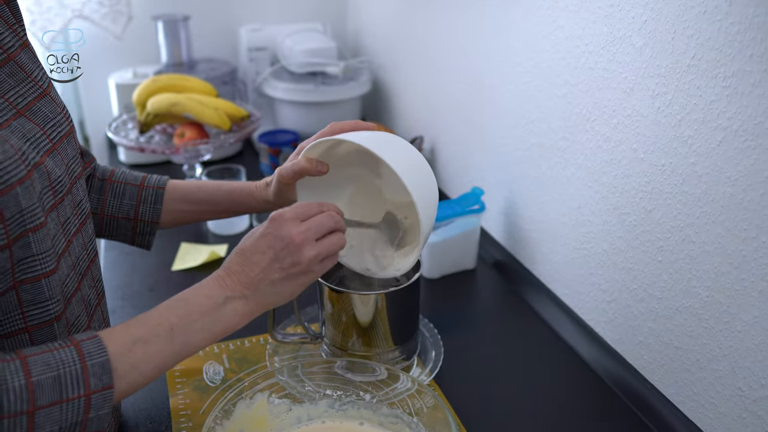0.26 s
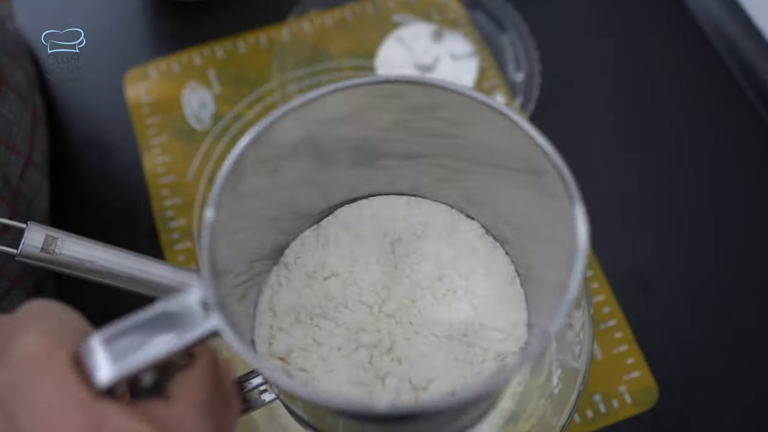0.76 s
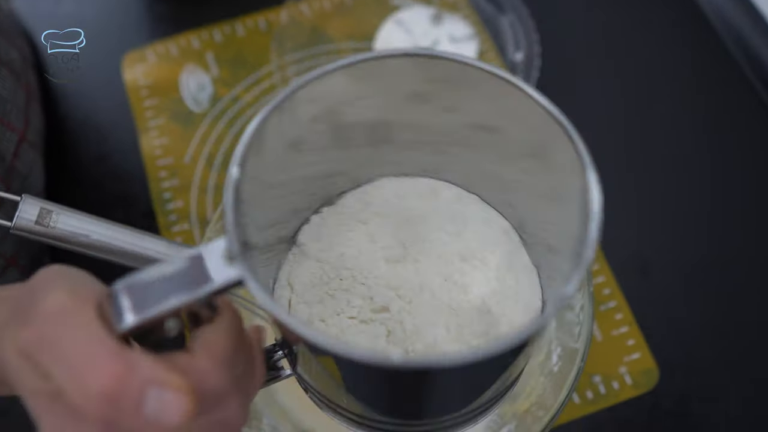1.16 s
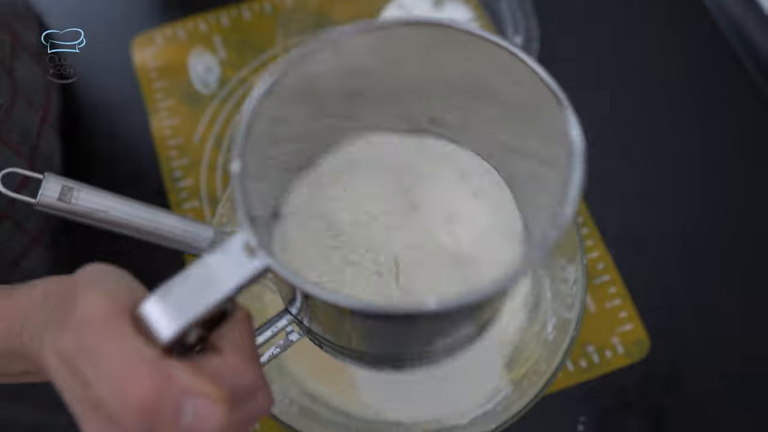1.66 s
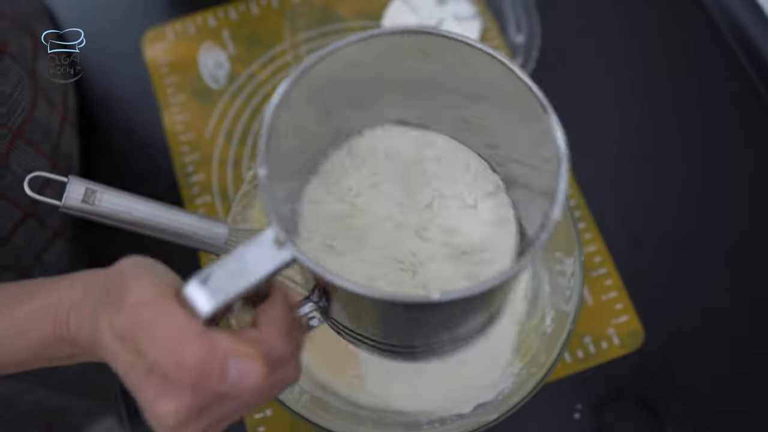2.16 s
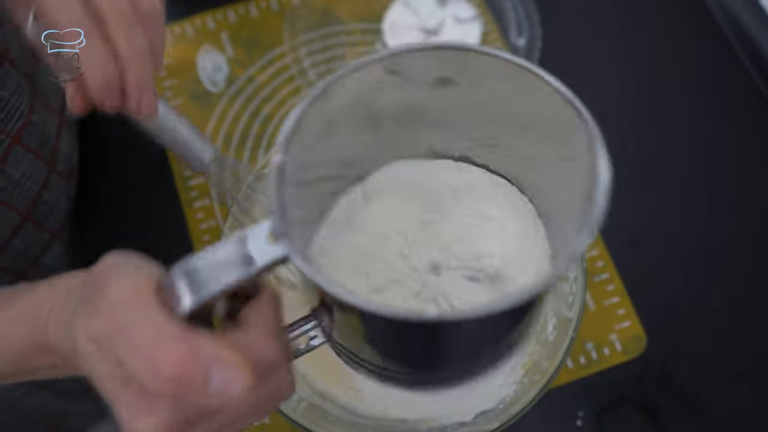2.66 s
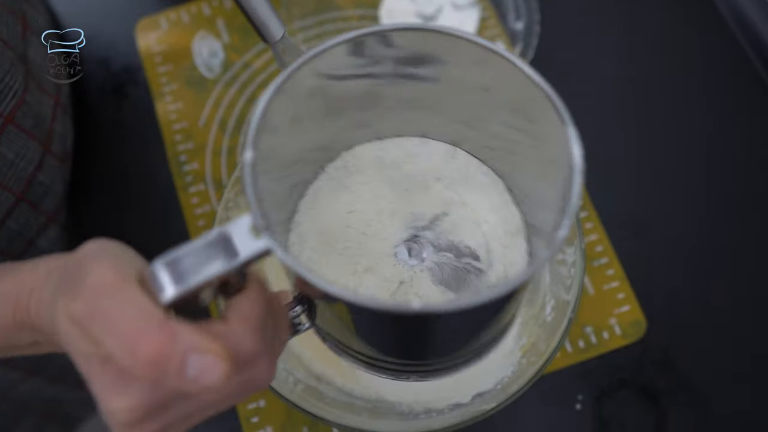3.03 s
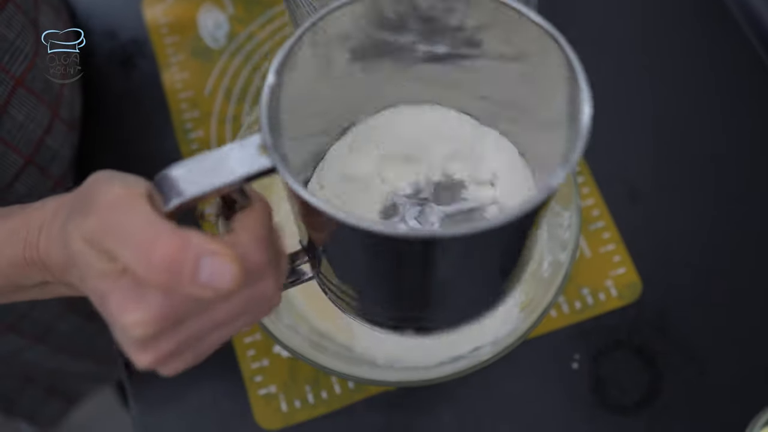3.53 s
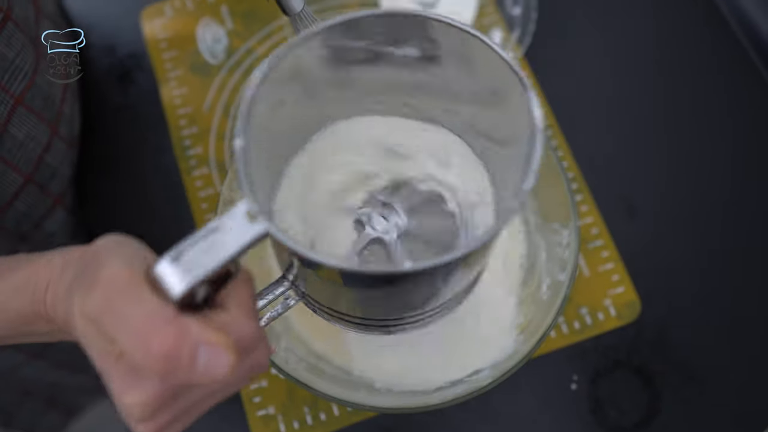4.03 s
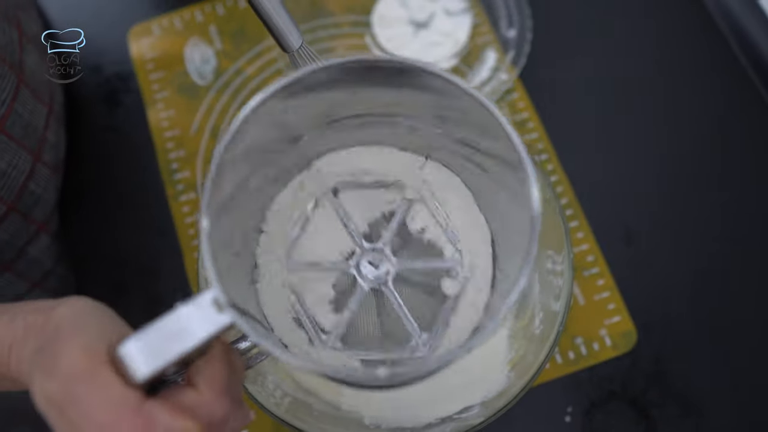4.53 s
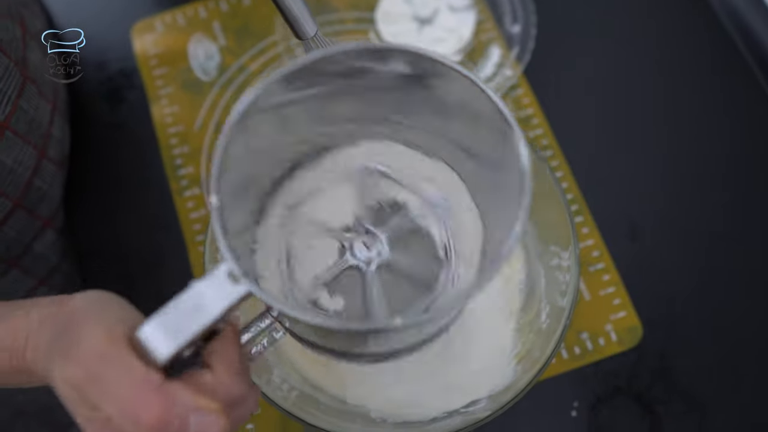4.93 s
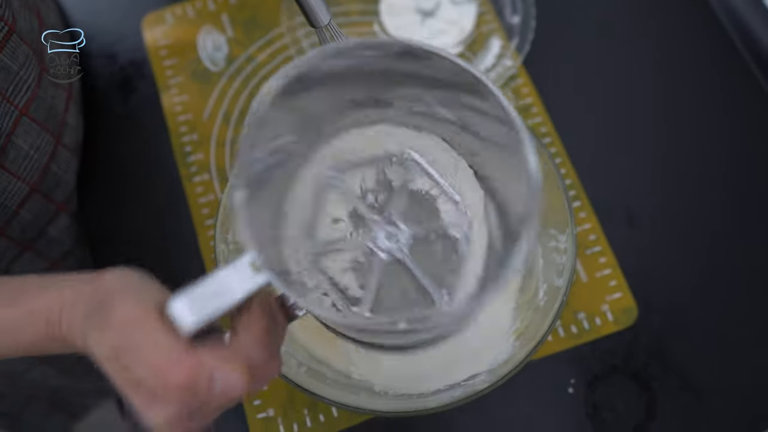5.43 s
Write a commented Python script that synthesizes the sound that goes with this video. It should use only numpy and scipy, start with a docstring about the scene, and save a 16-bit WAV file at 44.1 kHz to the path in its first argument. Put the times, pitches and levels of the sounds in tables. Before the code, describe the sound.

For the first 0.6 seconds, a steel spoon knocks and scrapes inside a plastic bowl, with two clearer hollow knocks near 0.1 and 0.5 seconds. From about 0.7 seconds, a squeeze-handle flour sifter is pumped close by, nearly five times a second. Each squeeze brings a gritty rasp of wire over mesh and a sharp, bright metal clack, followed by a lighter return click and small rattles. The handle spring gives tiny high squeaks, mostly between 0.8 and 2.3 seconds and occasionally after 4 seconds. A soft, low bump comes near 2.6 seconds. Between roughly 2.2 and 3.8 seconds the flour thins out, and the steel can sounds less muffled and rings longer. The rhythm holds until about 5.4 seconds, ending with lighter rattles around 5.6. A faint hush and appliance hum lie underneath, and the small kitchen adds a short tail to the impacts.

```python
"""A squeeze-handle flour sifter is pumped in a quiet kitchen, after a spoon knocks and scrapes a plastic bowl.
Each squeeze swings the wire beater over the mesh (a gritty rasp) and clacks the linkage against its
stops, ringing the steel can, which is less muffled as the flour runs out. The handle spring squeaks.
Behind it: hush, appliance hum, one dull bump. The small hard room adds a short tail to the impacts."""
import sys
import numpy as np
from scipy import signal
from scipy.io import wavfile
from scipy.ndimage import uniform_filter1d

SR = 44100
rng = np.random.default_rng(int(sys.argv[2]) if len(sys.argv) > 2 else 0)


def wav_out(sig):
    """Save sig, one row per channel (or a flat mono array), as 16-bit PCM at SR to the path in sys.argv[1]."""
    wavfile.write(sys.argv[1], SR, np.round(np.clip(np.atleast_2d(sig).T, -1, 1) * 32767).astype(np.int16))


N = 250929
SPLIT_HZ = 7300  # dip between the can's mid and top modes
EMPTYING_S = (2.2, 3.8)  # mesh goes from covered to bare

# wire-on-mesh spectrum: f/Hz, density/dB
STEEL_SPECTRUM = [(1120, -16), (1900, 4.5), (2270, -7.5), (3000, -0.5), (5420, -3), (7440, 6), (8800, 6),
                  (12000, 9), (12900, -0.5), (15600, -33)]
# linkage takes up slack before each snap: t/s, level/dB
TAKE_UPS = [(.7875, -20), (.991, -22), (1.204, -22), (1.4193, -21.5), (1.6272, -22), (1.8302, -21.5),
            (2.045, -22), (2.2593, -20.5), (2.4641, -23), (2.6695, -27), (2.8842, -25), (3.1119, -20.5),
            (3.3294, -23), (3.5417, -34), (3.7653, -34), (3.9782, -30), (4.2066, -26), (4.4247, -34),
            (4.6505, -28), (4.8739, -29), (5.0993, -28), (5.3517, -26.5)]
# handle squeezes: snap t/s, snap level/dB, rasp level/dB
SQUEEZES = [(0.8052, -15.5, -37), (1.0032, -18, -37.5), (1.2214, -13.5, -38.5), (1.4362, -15.5, -38.5),
            (1.6402, -15.5, -37), (1.8461, -16, -36), (2.0615, -14, -36), (2.28, -9.5, -34.5),
            (2.4799, -15.5, -37), (2.672, -26.5, -41), (2.9009, -14.5, -36), (3.1383, -15, -34),
            (3.352, -14.5, -33.5), (3.5688, -14, -33), (3.7911, -14, -34.5), (4.0031, -13.5, -33),
            (4.2246, -15, -32.5), (4.4484, -15.5, -34.5), (4.6729, -14.5, -33.5), (4.9002, -11, -35),
            (5.122, -14, -34.5), (5.372, -14, -34.5)]


def gain_of(db):
    return 10 ** (np.asarray(db) / 20)


def unit_rms(x):
    return x / np.sqrt(np.mean(x ** 2) + 1e-20)


def log_interp(points, hz):
    f, value = np.transpose(points)
    return np.interp(np.log(hz + 1), np.log(f + 1), value)


def colour(x, spectrum):
    """Minimum-phase filter of unit energy."""
    db = np.maximum(log_interp(spectrum, abs(np.fft.fftfreq(8192, 1 / SR))), -100)
    taps = np.fft.ifft(np.exp(np.conj(signal.hilbert(np.log(gain_of(db)))))).real[:2048]
    return signal.oaconvolve(x, taps / np.linalg.norm(taps))[:N]


def split_bands(x):
    return [signal.sosfilt(signal.butter(4, SPLIT_HZ, band, fs=SR, output="sos"), x)
            for band in ("low", "high")]


def ring(x, hz, width_hz):
    """Unit-energy mode; a small object radiates no bass."""
    r = np.exp(-np.pi * width_hz / SR)
    numerator = np.sqrt((1 - r * r) / 2) * np.array([1, 0, -1])
    return signal.lfilter(numerator, [1, -2 * r * np.cos(2 * np.pi * hz / SR), r * r], x)


def modes(x, table):
    return sum(gain_of(db) * ring(x, hz, width_hz) for hz, width_hz, db in table)


def glide(x, hz, width_hz):
    """Mode whose pitch follows a curve; weak bass."""
    r, turn = np.exp(-np.pi * width_hz / SR), np.exp(2j * np.pi * np.cumsum(hz) / SR)
    x = np.diff(x, prepend=0) / (2 * np.sin(np.pi * hz / SR))
    return np.sqrt(2 * (1 - r * r)) * (turn * signal.lfilter([1], [1, -r], x / turn)).real


def bursts(s, db, rise_ms, fall_ms):
    """Envelope of blows: smooth rise, exponential fall."""
    ms = np.arange(2000) / SR * 1000
    rise, fall = np.clip(rise_ms, .1, 9).reshape(-1, 1), np.clip(fall_ms, .2, 9).reshape(-1, 1)
    attack = np.minimum(ms / rise, 1)
    shape = np.sin(np.pi / 2 * attack) ** 2 * np.exp(-np.maximum(ms - rise, 0) / fall)
    shape += 0.19 * attack * np.exp(-ms / (7.8 * fall))  # loose parts rattle on
    at = np.minimum(np.round(s * SR).astype(int)[:, None] + np.arange(len(ms)), N)
    return np.bincount(at.ravel(), (gain_of(db)[:, None] * shape).ravel(), N + 1)[:N]


def chatter():
    """Contact force of loose parts: steady size, random sign."""
    return rng.choice([-1., 1.], N)


def grit(per_s, spread_db, tick_share):
    """Noise plus sparse, uneven ticks."""
    size = gain_of(spread_db * np.minimum(rng.exponential(1, N), 3))
    ticks = unit_rms(size * (rng.random(N) < per_s / SR) * chatter())
    return np.sqrt(tick_share) * ticks + np.sqrt(1 - tick_share) * rng.standard_normal(N)


def room_tone():
    """Kitchen hush and appliance drones."""
    hush = [(15, -63), (25, -4), (70, -0.5), (200, -8.5), (575, 3.5), (659, 7.5), (775, -8.5),
            (1020, -14.5), (16000, -29)]  # still room: f/Hz, density/dB
    drones = [(101, 6, -74), (590, 11, -79)]  # appliances: f/Hz, width/Hz, level/dB
    return gain_of(-59) * colour(rng.standard_normal(N), hush) + modes(rng.standard_normal(N), drones)


def room_tail(x):
    """Three sparse tails, fed in turn as hands and can move."""
    decay = [(200, 0.58), (1000, 0.5), (4000, 0.43), (9000, 0.2), (15000, 0.31)]  # room decay: f/Hz, t60/s
    out, turn = np.zeros(N), 2 * np.pi * 11. * np.arange(N) / SR
    at = np.arange(150, SR // 2 - 20, 20)
    for k in range(3):
        taps = np.zeros(SR // 2)
        taps[at + rng.integers(0, 20, len(at))] = rng.choice([-1., 1.], len(at))
        hz, t, bands = signal.stft(taps, SR, nperseg=128)
        tail = signal.istft(bands * gain_of(-60 * t / log_interp(decay, hz)[:, None]), SR, nperseg=128)[1]
        out += signal.oaconvolve(x * np.cos(turn + k * 2 * np.pi / 3), tail / np.linalg.norm(tail))[:N]
    return out * np.sqrt(2 / 3)


def bump(start_s=2.566, hz=140, db=-40, t60_s=.14, rise_s=.0083):
    """Soft low thud nearby."""
    t = np.maximum(np.arange(N) / SR - start_s, 0)
    return np.minimum(t / rise_s, 1) * gain_of(db - 60 * t / t60_s) * np.sin(2 * np.pi * hz * t)


def spoon_on_bowl():
    """Knocks ring the hollow bowl; the steel edge ticks, scrapes and pings."""
    knocks = [(0.119, -24.5, -31.5, 5800, -37), (0.184, -50, -45, 5600, -50), (0.212, -62, -42, 5500, -32),
              (0.223, -51, -57, 4600, -43), (0.264, -58, -37, 5900, -43), (0.288, -41.5, -45, 3500, -50),
              (0.477, -22, -47.5, 5200, -58), (0.563, -31, -46, 3840, -38)]  # spoon hits: t/s, knock/dB, tick/dB, ping f/Hz, ping/dB
    bowl_modes = [(358, -17, 0.16), (380, -12, 0.094), (463, -6, 0.053), (640, -19, 0.079),
                  (792, -12.5, 0.12), (870, -14.5, 0.27), (1500, -21.5, 0.047)]  # plastic bowl: f/Hz, level/dB, t60/s
    spoon_modes = [(2790, 70, -4), (3770, 140, -10), (5600, 120, -19), (8000, 200, -4), (9800, 180, -23)]  # steel spoon: f/Hz, width/Hz, level/dB
    scrapes = [
        [(.125, -71), (.17, -58), (.19, -48), (.27, -50), (.305, -51), (.325, -68)],
        [(.48, -50), (.52, -50), (.55, -74), (.565, -48), (.595, -43), (.62, -73)],
    ]  # one envelope per drag: t/s, level/dB
    edge_spectrum = [(1500, -36), (2800, 1.5), (5500, 2), (7000, -8), (10000, -6.5), (12500, -24),
                     (14500, -13)]  # edge on plastic: f/Hz, density/dB
    s, knock_db, tick_db, ping_hz, ping_db = np.transpose(knocks)
    impulses = np.bincount(np.round((s + .0006) * SR).astype(int), gain_of(knock_db), N)
    blow = np.convolve(impulses, np.hanning(30))[:N]
    out = -sum(gain_of(db) * ring(blow, hz, 2.2 / t60) for hz, db, t60 in bowl_modes)
    edge = bursts(s, tick_db + 6, rise_ms=.3, fall_ms=1.1) * chatter()
    t = np.arange(N) / SR
    for drag_s, drag_db in map(np.transpose, scrapes):
        gate = uniform_filter1d(1. * (t > drag_s[0]) * (t < drag_s[-1]), size=130)
        level = gate * gain_of(np.interp(t, drag_s, drag_db))
        edge += level * grit(per_s=2500, spread_db=3, tick_share=.4)
    force = chatter()
    for k, hz in enumerate(ping_hz):
        out += ring(bursts(s[[k]], ping_db[[k]], rise_ms=.18, fall_ms=1.4) * force, hz, width_hz=380)
    return out + gain_of(-6) * colour(edge, edge_spectrum) + gain_of(-16) * modes(edge, spoon_modes)


def spring_squeaks():
    """Handle spring under load: short, rising, unsteady whistles."""
    squeaks = [(.771, 6800, -25.5), (.916, 6720, -41), (1.405, 6460, -30), (1.611, 6030, -33),
               (2.026, 6720, -37), (2.228, 6460, -34), (2.256, 6000, -27), (2.763, 6370, -45),
               (3.991, 6370, -43), (4.207, 6370, -37), (4.888, 6370, -30), (5.555, 5250, -39)]  # spring whistles: t/s, f/Hz, peak/dB
    out, t = np.zeros(N), np.arange(-400, 400) / SR
    envelope = np.exp(-(t / .004) ** 2)
    for s, hz, db in squeaks:
        wobble = 1 + 1.4 * t + .05 * uniform_filter1d(rng.standard_normal(len(t)), size=60)
        at = round(s * SR) - 400
        out[at:at + 800] += gain_of(db) * envelope * np.sin(2 * np.pi * np.cumsum(hz * wobble) / SR)
    return out


def by_load(s, full, empty):
    """Blend from full-can to empty-can value."""
    return full + (empty - full) * np.clip((s - EMPTYING_S[0]) / (EMPTYING_S[1] - EMPTYING_S[0]), 0, 1)


def flour_bed(x):
    """Muffling by the flour, thinning as it runs out."""
    deep = [(65, -59.5), (130, -7.5), (343, -5), (419, 1), (822, 3.5), (1750, 5), (2400, -8.5), (3380, -10),
            (5720, -103)]  # full bed: f/Hz, density/dB
    thin = [(65, -36), (130, -6), (343, -6.5), (419, -4.5), (822, 3.5), (1750, 2), (2400, -6),
            (3380, -16.5), (5720, -103)]  # little flour left: f/Hz, density/dB
    bare = by_load(np.arange(N) / SR, 0, 1)
    return (1 - bare) * colour(x, deep) + bare * colour(x, thin)


def belly(x):
    """Low modes; one of them rises in pitch as the flour runs out."""
    low_modes = [(353.3, 31, -10), (510, 29, -16.5), (1626, 215, 7)]  # can and handle: f/Hz, width/Hz, level/dB
    rising_pitch = [(2.5, 638), (3.1, 769), (3.9, 883)]  # rising low mode: t/s, f/Hz
    rising_hz = np.interp(np.arange(N) / SR, *np.transpose(rising_pitch))
    return modes(x, low_modes) + gain_of(-5.5) * glide(x, rising_hz, width_hz=32)


def strokes():
    """Beater swings in order: start/s, rasp level/dB."""
    stirs = [(0.66, -36.5), (5.531, -48.5), (5.616, -46)]  # swings without a snap: t/s, level/dB
    snap_s, _, rasp_db = np.transpose(SQUEEZES)
    lead_ms = by_load(snap_s, 55.6, 55.3)
    rows = np.r_[np.c_[snap_s - lead_ms / 1000, rasp_db], stirs]
    return rows[np.argsort(rows[:, 0])].T


def flexed_can(detune=.03):
    """Grip and tilt detune each mode from stroke to stroke."""
    can_modes = [(3176, 390, -6.5), (4353, 460, -1), (5180, 170, -2.5), (5620, 110, -4), (6240, 320, -1),
                 (8145, 120, -5), (8820, 500, 4.5), (10470, 300, -4), (11500, 250, -5)]  # steel can: f/Hz, width/Hz, level/dB
    s, t = strokes()[0], np.arange(N) / SR
    drift = 1 + detune * rng.uniform(-1, 1, (len(s), len(can_modes)))
    return [(hz * np.interp(t, s, drift[:, k]), width, db) for k, (hz, width, db) in enumerate(can_modes)]


def beater_rasp(can):
    """Wires catch on the weave in dense ticks; the can rings along, the flour shuffles."""
    swing = [(0, -19), (.12, -6), (.25, 1.5), (.5, -6), (.75, -4), (1, -12)]  # wire speed: stroke fraction, level/dB
    s, mid_db = strokes()
    t = np.arange(N) / SR
    progress = np.interp(t, np.r_[s, N / SR], np.arange(len(s) + 1))
    stroke = np.minimum(progress.astype(int), len(s) - 1)
    speed_db = np.interp(progress - stroke, *np.transpose(swing))
    flutter = gain_of(0.81 * unit_rms(uniform_filter1d(rng.standard_normal(N), size=300)))
    top_db, low_db = mid_db + by_load(s, -17, -16.5), mid_db + by_load(s, -3, -6)
    mid, top, low = (flutter * uniform_filter1d((t > s[0]) * gain_of(db[stroke] + speed_db), size=200)
                     for db in (mid_db, top_db, low_db))
    ticks = grit(per_s=3000, spread_db=3, tick_share=.35)
    # single wires snap free, each waking one mode
    pings = sum(gain_of(db) * glide(grit(per_s=170, spread_db=5, tick_share=.71), hz, width_hz)
                for hz, width_hz, db in can)
    below, above = split_bands(colour(ticks, STEEL_SPECTRUM) + gain_of(-11) * pings)
    grains = grit(per_s=900, spread_db=3, tick_share=.3)
    shuffle = flour_bed(grains) + gain_of(-10.5) * belly(grains)
    return mid * unit_rms(below) + top * unit_rms(above) + low * unit_rms(shuffle)


def linkage_blows():
    """All blows, take-ups first: t/s, mid/dB, top/dB, thump/dB, rise/ms, fall/ms."""
    returns = [(.867, -24.5), (1.078, -25), (1.287, -22.5), (1.4976, -20.5), (1.705, -21.5), (1.9134, -30),
               (2.1202, -26), (2.332, -26.5), (2.5408, -28), (2.7419, -29), (2.969, -27.5), (3.1886, -27.5),
               (3.4134, -29), (3.628, -30.5), (3.8514, -34), (4.0645, -28), (4.281, -31), (4.508, -30),
               (4.7353, -34.5), (4.9566, -38), (5.2056, -31.5), (5.412, -32.5)]  # handle meets its back stop: t/s, level/dB
    rattles = [(.662, -31, -7, 1.3), (0.753, -36, -9, 2), (0.8332, -31, 1, 0.55), (0.8553, -26.5, 7, .8),
               (0.9578, -29.5, 2, 0.54), (1.087, -36, -4, 1), (2.788, -37.5, -13, 1.6),
               (4.377, -38, -3, .7), (1.0398, -26, 2, .9), (1.067, -30, 1, 0.58), (1.173, -32, 2, 1.2),
               (1.253, -30.5, -4, 1.2), (1.2763, -28.5, 7, 0.79), (1.383, -33, -1, 2.8), (1.488, -30, 5, 1),
               (1.591, -32, 5, .85), (1.693, -30.5, -3, 2.8), (1.7973, -28.5, 2, .4), (1.9036, -30, 2, 1.2),
               (1.9452, -34.5, -17, 1), (2.0102, -31.5, -2, .6), (2.112, -28, 0, 1.6),
               (2.226, -33, -1, 1.5), (2.432, -33, 7, 0.48), (2.511, -28.5, -2, 0.89),
               (2.561, -37, -7, 2.2), (2.6392, -30, 5.5, 1.5), (2.709, -28.5, -2, 0.52),
               (2.7553, -36, -5, 5), (2.847, -30.5, 2, .45), (2.9275, -39, 5, 0.8), (2.961, -30.5, -3, 2.5),
               (3.1585, -31, 3, 0.77), (3.224, -33, -8, 1.9), (3.3762, -36, 4, 1.6), (3.589, -28, -6, 2),
               (3.598, -28, 1, 1.6), (3.813, -30.5, -4, 3.1), (3.9372, -36.5, 1, .8),
               (4.027, -29.5, -5, 2.2), (4.1963, -52, -8, 1.1), (4.2496, -28.5, -8, 3.1),
               (4.3376, -39, -9, 1.1), (4.4671, -20, -5, 2.1), (4.556, -39, -11, 1.4),
               (4.692, -19, -3.5, 1.8), (4.918, -24, 2, 3.6), (5.0611, -35, 2, 0.98),
               (5.1426, -17, -5.5, 1.1), (5.3905, -23, -6, 3.4), (5.472, -53, -8, .9),
               (5.505, -40.5, 6, 4.4), (5.543, -33, -5, 1.4), (5.6198, -33, -2, 1.8)]  # loose parts: t/s, level/dB, top over mid/dB, rise/ms
    # blow shapes as (full, empty) pairs: mid/dB, top/dB, thump/dB, rise/ms, fall/ms
    take_up_shape = [(0, -9, -8, 3.2, 1.35), (0, -12, -5.5, 3.2, 4.5)]
    snap_shape = [(-14, -2, -12.5, 1, 1.45), (-5, -0.5, -9, 0.98, 2.65)]  # flour muffles the mid ring
    return_shape = [(0, -2.5, -6.5, 1.1, 2.4), (0, -1.5, -1, 1.1, 6.3)]
    blows = []
    for events, shape in [(TAKE_UPS, take_up_shape), (SQUEEZES, snap_shape), (returns, return_shape)]:
        s, db = np.transpose(events)[:2]
        mid_db, top_db, thump_db, rise_ms, fall_ms = (by_load(s, *pair) for pair in zip(*shape))
        blows.append([s, db + mid_db, db + top_db, db + thump_db, rise_ms, fall_ms])
    s, db, tilt_db, rise_ms = np.transpose(rattles)
    fall_ms = 1.96 + 0.7 * rise_ms  # glancing blows die slowly
    blows.append([s, db - tilt_db / 2, db + tilt_db / 2, db + by_load(s, -9.5, -6.5), rise_ms, fall_ms])
    return np.hstack(blows)


def linkage_clacks(can):
    """Crack, ring and thump; each blow hits another spot, so the mode mix varies."""
    s, mid_db, top_db, thump_db, rise_ms, fall_ms = linkage_blows()
    spot_db = rng.uniform(-6, 4, (len(s), len(can)))
    spot_db[:len(TAKE_UPS), 1] += 3  # the linkage pin favours this mode

    def force(db):
        return bursts(s, db, rise_ms, fall_ms) * chatter()

    mid_crack = split_bands(colour(force(mid_db), STEEL_SPECTRUM))[0]
    top_crack = split_bands(colour(force(top_db), STEEL_SPECTRUM))[1]
    steel = gain_of(-5) * (mid_crack + top_crack)
    for k, (hz, width_hz, mode_db) in enumerate(can):
        band_db = top_db if hz[0] > SPLIT_HZ else mid_db
        steel += gain_of(-4) * glide(force(band_db + mode_db + spot_db[:, k]), hz, width_hz)
    thump = bursts(s, thump_db, rise_ms + .5, fall_ms + 2.) * chatter()
    return gain_of(-2.5) * steel + gain_of(-1.5) * flour_bed(thump) + gain_of(-9.5) * belly(thump)


def scene():
    can = flexed_can()
    clacks, knocks = linkage_clacks(can), spoon_on_bowl() + bump()
    send = gain_of(-6) * clacks + gain_of(-8.5) * knocks
    return (room_tone() + clacks + knocks + beater_rasp(can) + spring_squeaks() + room_tail(send))[None]


def record(dry, shelf_hz=15800, limit_hz=16974):
    """Bass cut, soft clip, treble shelf, band limit."""
    x = signal.sosfilt(signal.butter(2, 60., "high", fs=SR, output="sos"), dry)  # small capsule
    x = .8 * np.tanh(x / .8)  # preamp rounds the hardest clacks
    passband = signal.oaconvolve(x, signal.firwin(401, shelf_hz, window=("kaiser", 6), fs=SR)[None], "same")
    x = passband + gain_of(-33) * (x - passband)
    return signal.oaconvolve(x, signal.firwin(511, limit_hz, window=("kaiser", 9), fs=SR)[None], "same")


dry = scene()
out = record(dry)
wav_out(out)
```